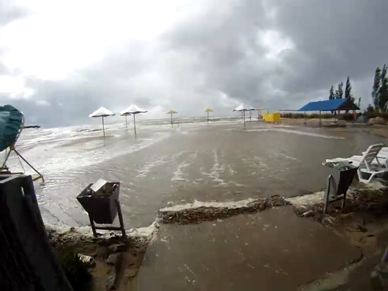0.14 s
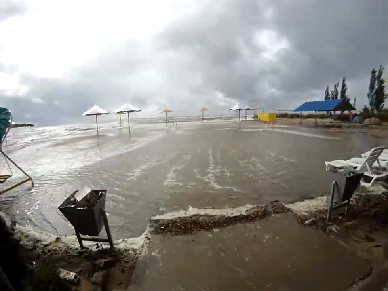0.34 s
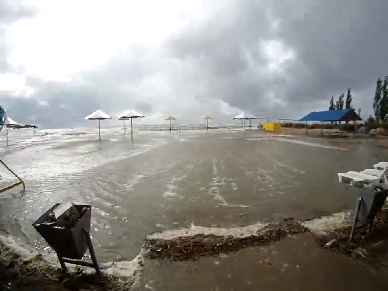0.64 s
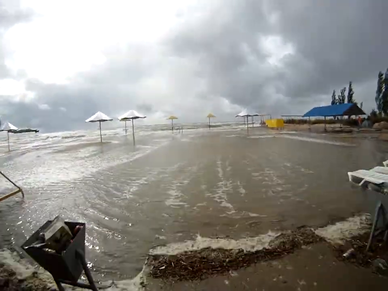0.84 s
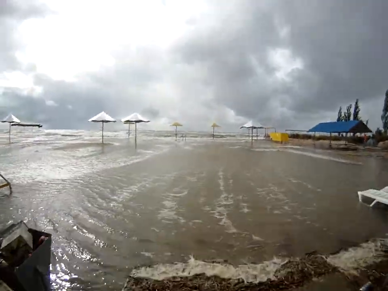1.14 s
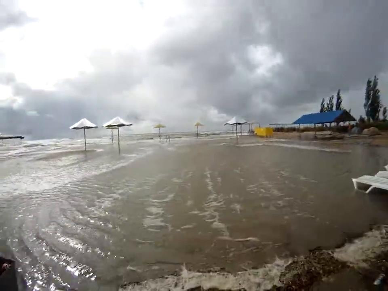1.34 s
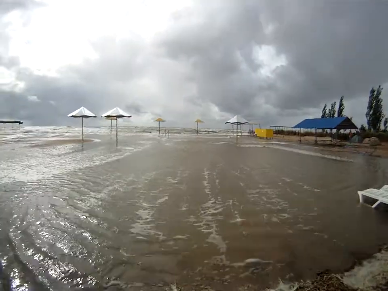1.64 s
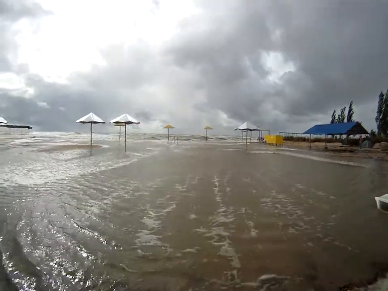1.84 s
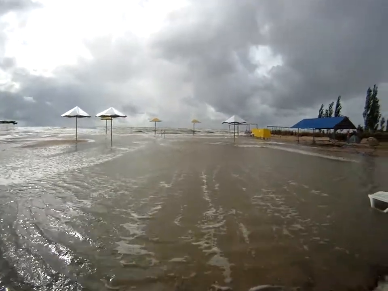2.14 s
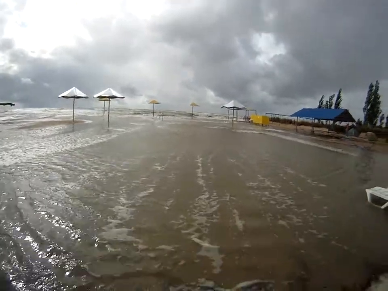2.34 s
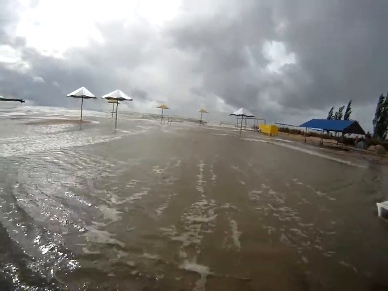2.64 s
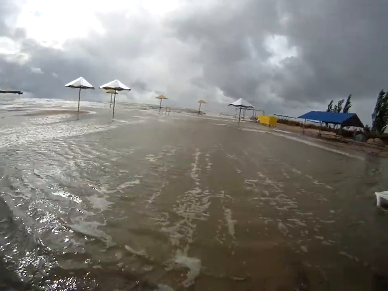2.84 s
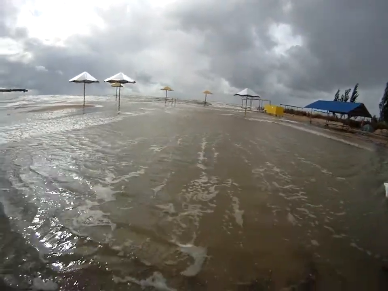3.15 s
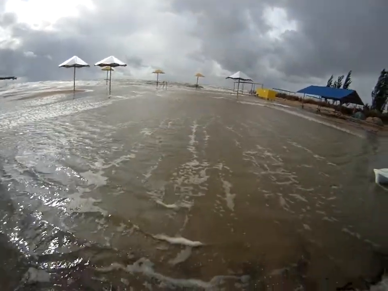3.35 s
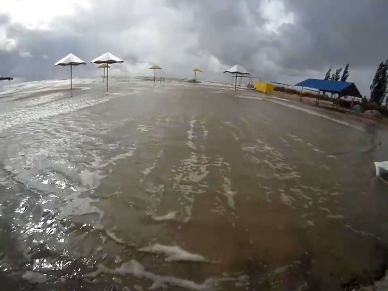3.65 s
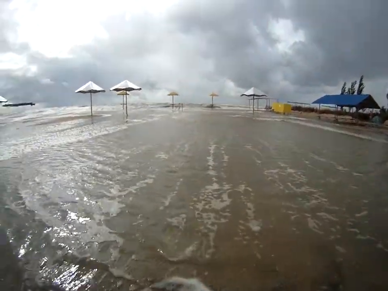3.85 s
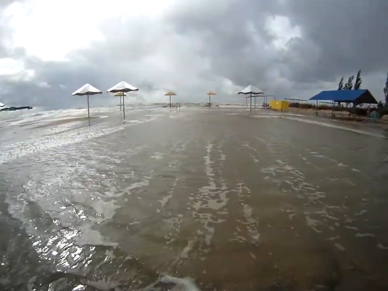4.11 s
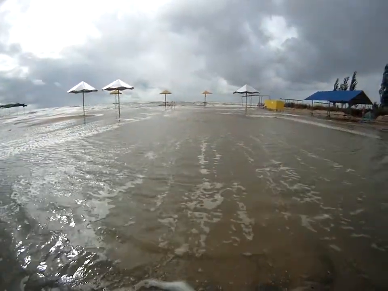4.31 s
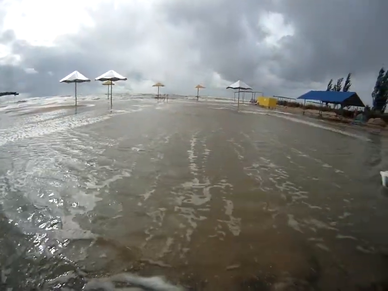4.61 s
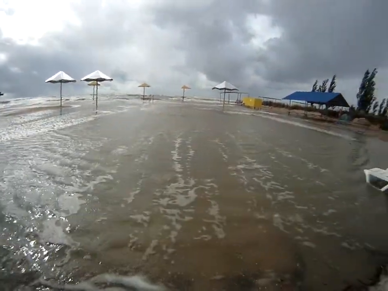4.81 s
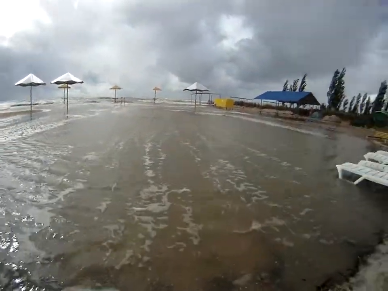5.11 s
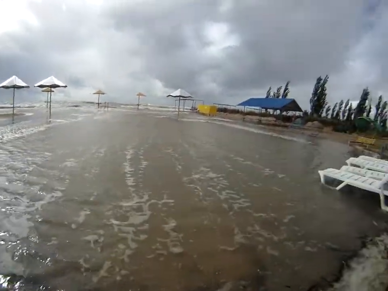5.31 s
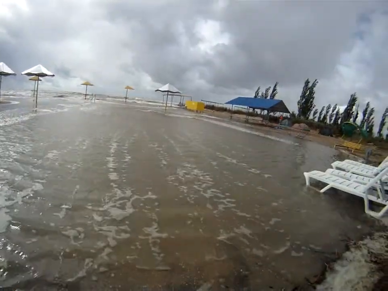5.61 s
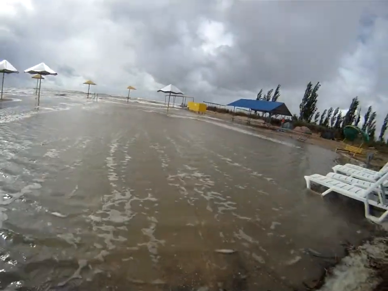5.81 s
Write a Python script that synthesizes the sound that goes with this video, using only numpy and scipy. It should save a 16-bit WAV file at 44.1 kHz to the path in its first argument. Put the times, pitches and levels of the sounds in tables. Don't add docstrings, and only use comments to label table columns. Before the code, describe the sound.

Throughout, a quiet unsteady bed of low buffeting wind and continuous surf rush sounds hollow and nasal, as if heard inside a sealed plastic case on an open stormy beach. Small clicks fall at 0.1 and 0.3 s, with faint brushing near 0.5. At 0.72-0.79 s a loud rattling knock cracks out. Light brushing follows, then a hard snap at 1.4 with little rattles and thumps to 1.55. Softer clicks come around 2.05. From 2.57 to 3.5 s skin rubs and scrapes the shell, with dull bumps and a tiny falling squeak at 2.9. A dense clatter peaks at 3.63, with another snap at 3.79. Lighter rubs and ticks lead to a strong, bright squeaky rub and dark creak at 4.4-4.7 s. Afterwards only faint brushes, a small creak near 5.04, and light clicks with thumps at 5.7-5.9. The microphone is close, dry, low-fidelity, with gritty mirrored treble.

```python
import sys
import numpy as np
from scipy import signal
from scipy.fft import rfft, irfft, next_fast_len
from scipy.io import wavfile
from scipy.ndimage import uniform_filter1d, map_coordinates

SR = 44100
rng = np.random.default_rng(int(sys.argv[2]) if len(sys.argv) > 2 else 0)


def digitize_waveform(pressure):
    field = np.atleast_2d(pressure).T
    bounded = np.clip(field, -1, 1)
    quanta = np.round(bounded * 32767).astype(np.int16)
    wavfile.write(sys.argv[1], SR, quanta)


def gain_from_decibels(decibels):
    exponent = np.asarray(decibels, float) / 20
    return 10 ** exponent


N = 263263


def unit(x):
    return x / np.sqrt(np.mean(x ** 2) + 1e-20)


def along(points, hz):
    f, v = np.transpose(points)
    return np.interp(np.log(hz + 1), np.log(f + 1), v)


def curves(rows):
    s, *cols = np.transpose(rows)
    return [np.interp(np.arange(N) / SR, s, c) for c in cols]


def wobble(rate_hz):
    knots = rng.standard_normal(int(N * rate_hz / SR) + 4)
    return map_coordinates(knots, [np.arange(N) * rate_hz / SR])


def filtered(x, response):
    m = next_fast_len(len(x) + 2048)
    return irfft(rfft(x, m) * response(np.fft.rfftfreq(m, 1 / SR)), m)[:len(x)]


def resonant(modes):
    def response(f):
        total = 0
        for k, (hz, width_hz, db) in enumerate(modes):
            total = total + (-1) ** k * gain_from_decibels(db) * 1j * f * width_hz / (hz * hz - f * f + 1j * f * width_hz)
        return total
    return response


def patchy(depth_db):
    z = signal.stft(rng.standard_normal(N + 512), nperseg=256)[2]
    field = uniform_filter1d(rng.standard_normal(z.shape), size=4, axis=0)
    field = uniform_filter1d(field, size=12, axis=1)
    return signal.istft(z * gain_from_decibels(depth_db * unit(field)), nperseg=256)[1][:N]


def storm():
    # time in seconds, wind rumble in dB, surf in dB.
    strength = [(0.0, -48, -49), (0.51, -51.5, -50), (0.66, -49.5, -49), (1.11, -48, -51.5),
                (1.46, -48, -49), (1.98, -50, -49.5), (2.34, -49, -52), (2.56, -50.5, -52),
                (2.76, -46, -47.5), (3.37, -49, -51), (3.76, -47, -49.5), (4.01, -51, -48.5),
                (4.39, -50, -51), (4.77, -43.5, -50), (4.95, -48, -47), (5.12, -48, -51.5),
                (5.69, -51.5, -51.5), (5.97, -46, -50)]
    # centre in Hz, width in Hz, level in dB.
    case = [(895, 183, -4), (1279, 108, -0.5), (2164, 308, 1.5), (3190, 1200, -9.5), (3596, 220, 0),
            (5420, 830, -15.5)]
    # frequency in Hz, density in dB per Hz.
    rumble_spectrum = [(12, -23), (20, -3.5), (43, -8.5), (125, -15), (287, -21), (462, -25.5),
                       (700, -34.5), (910, -72), (1540, -120)]
    surf_spectrum = [(300, -25), (600, -4), (1500, -34), (3000, -17), (4500, -26), (5500, -36.5),
                     (6000, -14.5)]
    rumble_db, surf_db = curves(strength)
    gusts = gain_from_decibels(2.86 * wobble(12))
    rumble = unit(gusts * filtered(rng.standard_normal(N), lambda hz: gain_from_decibels(along(rumble_spectrum, hz))))
    spray = patchy(depth_db=0.86) * gain_from_decibels(1.36 * wobble(22) + 1.17 * wobble(61))
    ringing = unit(filtered(spray, resonant(case)))
    leak = unit(filtered(patchy(depth_db=4.0), lambda hz: gain_from_decibels(along(surf_spectrum, hz))))
    surf = unit(ringing + gain_from_decibels(-5.5) * leak)
    return gain_from_decibels(rumble_db) * rumble + gain_from_decibels(surf_db) * surf


def contacts():
    # start in seconds, peak in dB, tilt in dB per octave, sharp edge in dB.
    snaps = [(0.1028, -23.5, 22, -30), (0.2958, -34.5, 8, -6), (0.7301, -22.5, -17, -11),
             (0.7759, -9.5, -6, -8), (1.4107, -12.5, 10, -11.5), (2.0845, -30, 8, -13),
             (2.6607, -34, -6, 0), (3.2057, -31, 3, -19), (3.2702, -27.5, 2, -26), (3.2988, -36, -11, -12),
             (3.5726, -22.5, -2, -10), (3.6339, -10, 9, -33), (3.7888, -16.5, 4.5, -11.5),
             (4.18, -27, -5.5, -30), (5.8078, -36.5, -23, -21), (5.8786, -40, -3, 0.5)]
    rattles = [(0.7208, -29, -14, -11), (0.7436, -15, -8, -14), (0.7889, -16.5, -1.5, -30),
               (1.4664, -35.5, -16, -6), (1.481, -26, -6, -20), (1.5095, -27.5, -10, -25),
               (1.5534, -36.5, -17, -17), (2.0186, -21.5, 1.5, -12), (2.0957, -40.5, 11, 4),
               (2.5722, -39.5, -21, -2), (2.766, -33, -7.5, -16), (2.9254, -29.5, -14, -24),
               (2.9336, -25, -3.5, -9), (3.241, -36.5, 17, 1), (3.541, -22.5, -4.5, -6.5),
               (3.5583, -22.5, -2, -8), (3.5911, -23.5, -4.5, -9), (3.6143, -20, -3.5, -10),
               (3.737, -27, -8, -8), (4.1387, -29, -8, -19), (4.2463, -28.5, 4, -19), (4.345, -33, 8, -7),
               (3.397, -32, 9, -18), (4.787, -34, 3, -4), (5.6798, -30, -13, -14)]
    creaks = [
        (2.6217, -39.5, -16, -15),
        (3.6303, -17.5, 5, -9.5),
        (3.7297, -28.5, -14, -3.5),
        (4.1968, -31, -3, -7),
        (4.59, -19, -11, -6),
        (5.0367, -31, 3, -5.5),
    ]
    kinds = ((snaps, (0.018, -10)), (rattles, (0.023, -4)), (creaks, (0.084, -11.5)))
    return sorted(tuple(row) + kind for rows, kind in kinds for row in rows)


def clicks():
    # frequency in Hz, level in dB.
    knock = [(860, 0), (1280, 3.5), (1650, 2.5), (2050, 6.5), (2400, -5)]
    out, t = np.zeros(N + 4096), np.arange(1536) / SR

    def pulse(at_s, width_s):
        return -np.exp(-((t - at_s) / width_s - 2) ** 2)

    def edge(f):
        return resonant([(3500, 1300, 0)])(f) ** 2 + gain_from_decibels(-2)

    def soft(f):
        return 1 / (1 - (f / 2500) ** 2 + 0.9j * f / 2500)

    for s, db, tilt_db, edge_db, t60_s, rattle_db in contacts():
        decay = gain_from_decibels(rattle_db - 6 - 60 * t / (0.82 * t60_s))
        rattle = decay * (1.7 * rng.standard_normal(len(t)) + pulse(0.00054, 0.00008))
        modes = resonant([(hz, 9.5 / t60_s * (hz / 1500) ** 1.37, mode_db + tilt_db * np.log2(hz / 1400))
                          for hz, mode_db in knock])
        body = filtered(pulse(0, 0.00008) + rattle, lambda f: modes(f) * soft(f))
        sharp = filtered(pulse(0, 0.00005) + 0.7 * rattle, edge)
        body /= np.abs(body).max()
        sharp /= np.abs(sharp).max()
        out[round(s * SR):][:len(t)] += gain_from_decibels(db) * (body + gain_from_decibels(edge_db + 8.5) * sharp)
    return out[:N]


def thumps():
    # time in seconds, peak in dB, width in ms.
    pushes = [(0.7892, -23, 1.8), (1.468, -31, 2.7), (1.481, -31.5, 3.2), (1.5104, -29.5, 2.3),
              (1.5535, -30.5, 1.95), (1.592, -39.5, 1.9), (2.6238, -25, 3.1), (2.6657, -30, 2.2),
              (2.7669, -31.5, 1.8), (2.792, -32.5, 4.7), (3.088, -31.5, 2.8), (3.5582, -32.5, 3.1),
              (3.6345, -16.5, 1.1), (3.653, -32, 12), (3.791, -29, 1.6), (4.0073, -38, 2.9),
              (4.487, -39.5, 2.5), (4.947, -38, 3.3), (5.0417, -30.5, 2.2), (5.681, -26, 1.4),
              (5.8088, -27.5, 1.6)]
    pulls = [(0.1036, -31.5, 1.74), (0.469, -40, 3.6), (0.7449, -32, 1.3), (1.4106, -26.5, 2.2),
             (1.7363, -36, 1.8), (2.0194, -25.5, 1.52), (2.084, -41, 1.4), (2.572, -36, 1.9),
             (2.6215, -30, 0.91), (2.631, -35, 3.5), (2.7045, -38, 2), (2.811, -37, 2), (2.935, -25, 1.6),
             (3.319, -29, 2.2), (3.638, -25, 2.9), (3.7308, -33, 1.9), (3.7861, -26, 3.5),
             (3.7902, -24.5, 1.5), (3.9374, -41, 1.6), (4.1978, -34.5, 2.4), (4.3055, -40, 3.4),
             (4.59, -31.5, 3.5), (4.6229, -33, 1.2), (4.6551, -33.5, 1.6), (4.6894, -37, 2.1),
             (4.8433, -39, 2.1), (5.159, -33.5, 2.2), (5.2676, -34, 1.7), (5.3917, -39.5, 4.7),
             (5.91, -38.5, 2.2)]
    out, t = np.zeros(N + 4096), np.arange(-1024, 2048) / SR
    for side, rows in ((1, pushes), (-1, pulls)):
        for s, db, width_ms in rows:
            u = 1750 * t / width_ms
            shape = np.exp(-u ** 2) - 0.27 * np.exp(-((u - 2.6) / 3.4) ** 2)
            out[round(s * SR):][:len(t)] += side * gain_from_decibels(db + 3.5) * shape
    return out[1024:][:N]


def strokes():
    # start in seconds, length in seconds, level in dB, spot in octaves over 1 kHz, spread in octaves.
    brushes = [(0.258, 0.0086, -48.5, 1.4, 1.6), (0.302, 0.046, -57, 1.2, .7),
               (0.468, 0.016, -46.5, 0.67, 1.9), (.49, 0.048, -50.5, 0.94, 0.73),
               (.62, .02, -54.5, 0.27, 0.6), (0.888, 0.015, -51, 1.6, 0.6), (1.146, 0.029, -53, 1.1, 1.1),
               (1.207, 0.018, -52, 1.2, 1), (1.25, .11, -55, 0.88, 0.38), (1.643, 0.1, -53, 0.96, 1),
               (2.592, 0.029, -55.5, 1.6, 1.1), (3.788, 0.049, -46, 1.03, 0.88),
               (3.858, .02, -43.5, 1.56, 1.2), (3.901, 0.053, -45.5, 0.98, 1.2),
               (4.032, 0.057, -49, 0.83, 0.88), (4.104, 0.064, -50, 1.6, 1.1), (4.194, 0.036, -53, 1.1, 1),
               (4.31, 0.017, -54.5, 1.8, .4), (4.9, 0.022, -52, .3, .5), (4.985, 0.02, -51, 1.1, 0.88),
               (5.035, 0.016, -48.5, 1.2, 1.1), (5.135, 0.022, -54, 0.83, 1.5),
               (5.886, 0.032, -57, .5, 0.63)]
    rubs = [(2.667, 0.011, -38.5, 1.56, 1.1), (2.678, 0.015, -41, 1.9, 1.1),
            (2.716, 0.049, -41.5, 0.82, 1.23), (2.788, 0.037, -47.5, 0.49, 1.5),
            (2.832, 0.031, -42.5, 0.84, 1.1), (2.882, 0.017, -39.5, 1.78, .6),
            (3.024, 0.058, -45.5, 1.3, 1.8), (3.067, 0.072, -43.5, 1.04, 1.3),
            (3.154, 0.029, -39.5, 1.04, 1.1), (3.295, 0.079, -42.5, 2, 1.1), (3.331, 0.12, -46, 1, 0.75),
            (3.456, 0.057, -45, 1.6, 1.7), (3.512, 0.012, -47, 0.52, 1.7), (3.627, 0.012, -36, 1.05, 1.26),
            (4.382, 0.016, -42, 1.5, 0.99), (4.416, 0.069, -35, 1.7, 0.33), (4.429, 0.028, -37, 1.74, 1.1),
            (4.504, 0.023, -39, 1.45, 1), (4.528, 0.054, -29, 1.69, 0.4), (4.581, 0.033, -32, 0.27, 0.79),
            (4.606, 0.13, -37, 0.63, 1.1), (4.654, 0.055, -33.5, 1.45, 0.91),
            (4.747, .055, -42, 0.86, 0.62), (4.538, 0.048, -42, .2, .6)]
    group_octaves = [
        .3,
        1.1,
        1.65,
        2.2,
    ]
    rise_db_per_s, fall_db_per_s, sag_db = 1498, 600, 2.5
    tail_db, tail_db_per_s = -15, 134
    off_spot_db = 7
    s, length_s, db, spot, spread = np.transpose(brushes + rubs)[..., None]
    t = np.arange(0, N, 32) / SR
    after_s = np.maximum(t - s - length_s, 0)
    release_db = np.maximum(-fall_db_per_s * after_s, tail_db - tail_db_per_s * after_s)
    hold_db = -sag_db * np.clip((t - s) / length_s, 0, 1)
    pressure_db = db - rise_db_per_s * np.maximum(s - t, 0) + hold_db + release_db
    share_db = -off_spot_db * ((np.array(group_octaves) - spot) / spread) ** 2
    gains = np.sqrt(gain_from_decibels(2 * share_db).T @ gain_from_decibels(2 * pressure_db))
    return [np.interp(np.arange(N) / SR, t, g) for g in gains]


def hand():
    # centre in Hz, width in Hz, level in dB.
    drag = [(913, 86, 0.59), (1253, 91, 3.5), (1640, 270, 0.5)]
    scrape = [(2030, 444, -0.31), (2210, 610, -0.62)]
    squeak = [(2690, 300, 4.5), (3310, 395, 5), (3770, 150, -16)]
    fizz = [(3715, 206, 6), (4255, 145, 4.5), (5120, 1100, 3), (5260, 170, -11)]
    grip_db = 0.8 * wobble(40) + 1.15 * wobble(200)
    out = np.zeros(N)
    for gain, modes in zip(strokes(), (drag, scrape, squeak, fizz)):
        slips = patchy(depth_db=-1.43) * gain_from_decibels(grip_db + 0.83 * wobble(90))
        centre_hz = np.mean(modes, axis=0)[0]
        span_hz = np.ptp(modes, axis=0)[0]
        group = resonant([(centre_hz, 5.8 * span_hz, 0)])
        out += gain * unit(filtered(slips, lambda f: resonant(modes)(f) * group(f)))
    return out


def chirps():
    # start in seconds, length in seconds, level in dB, start in Hz, end in Hz.
    slides = [
        (2.886, 0.021, -30.5, 3390, 2750),
    ]
    out, t = np.zeros(N), np.arange(N) / SR
    for s, length_s, db, start_hz, end_hz in slides:
        u = np.clip((t - s) / length_s, 0, 1)
        hz = (start_hz + (end_hz - start_hz) * u) * (1 + 0.03 * wobble(400))
        tone = np.sin(2 * np.pi * np.cumsum(hz) / SR)
        out += gain_from_decibels(db + 4.3 * wobble(300)) * np.sin(np.pi * u) * tone
    return out


def ducked(x):
    threshold_db, lag_s, recovery_s = -29, 0.025, 0.1
    t = np.arange(SR // 2) / SR - lag_s
    memory = np.exp(-np.abs(t) / np.where(t > 0, recovery_s, lag_s / 4))
    loud = np.abs(signal.fftconvolve(x ** 2, memory / memory.sum())[:N])
    return x / np.sqrt(1 + loud / gain_from_decibels(2 * threshold_db))


def scene():
    return (storm() + hand() + clicks() + thumps() + chirps())[None]


def roll_off(x):
    return signal.sosfilt(signal.butter(12, 16650, fs=SR, output="sos"), x)


def record(dry):
    guarded = filtered(ducked(dry[0]), lambda hz: 1 / np.sqrt(1 + (hz / 5400) ** 16))
    slow = signal.resample_poly(guarded, 40, 147)
    held = signal.resample_poly(np.repeat(slow, 4), 147, 160)[:N]
    low = filtered(held, lambda hz: hz < 15320)
    struck = np.zeros(N)
    struck[[round(c[0] * SR) for c in contacts() if c[1] > -33]] = 1
    gate = np.minimum(signal.fftconvolve(struck, np.hanning(400), "same"), 1)
    topped = low + gain_from_decibels(-18) * gate * (held - low)
    hz, _, z = signal.stft(topped, SR, nperseg=2048)
    valley = (hz > 11400) & (hz < 12450)
    hiss = (hz > 8000) & (hz < 10000)
    z[valley] *= np.abs(z[valley]).mean(axis=0) > gain_from_decibels(-26) * np.abs(z[hiss]).mean(axis=0)
    mix = signal.istft(z, SR, nperseg=2048)[1][None, :N]
    return roll_off(mix)


dry = scene()
out = record(dry)
digitize_waveform(out)
```